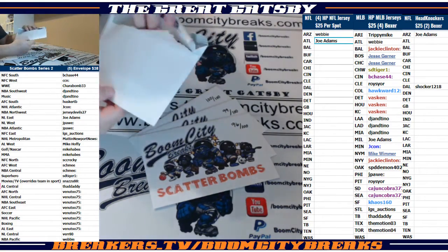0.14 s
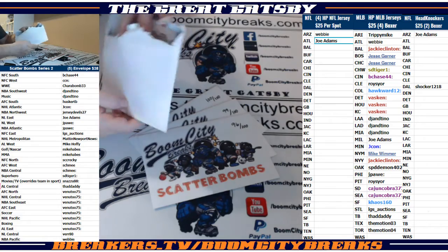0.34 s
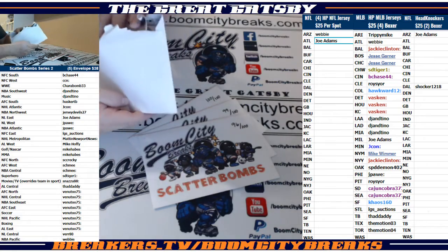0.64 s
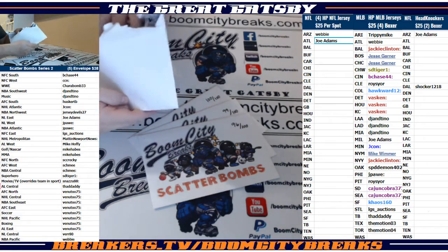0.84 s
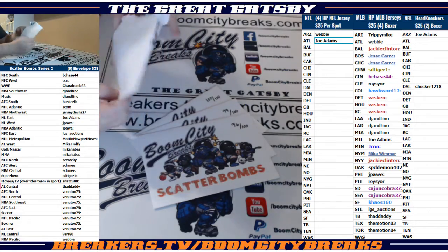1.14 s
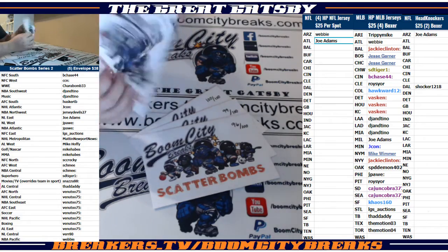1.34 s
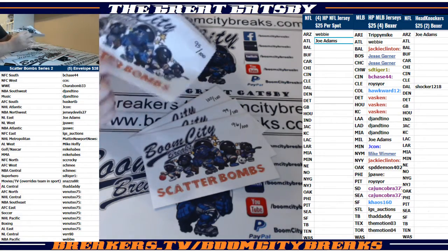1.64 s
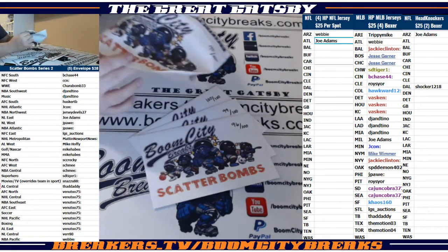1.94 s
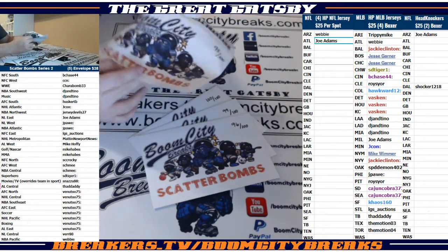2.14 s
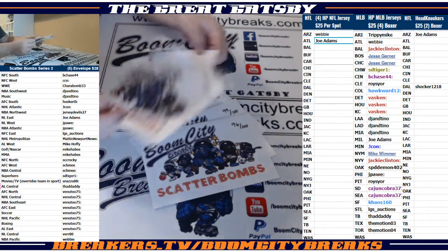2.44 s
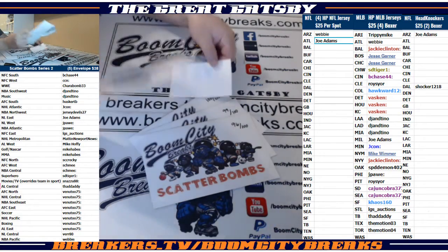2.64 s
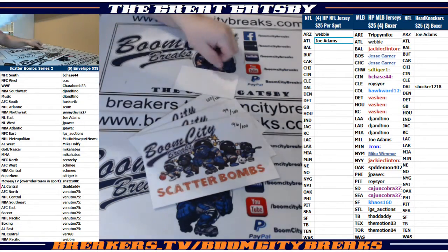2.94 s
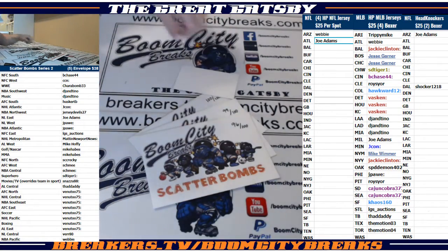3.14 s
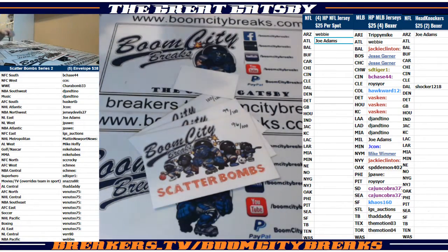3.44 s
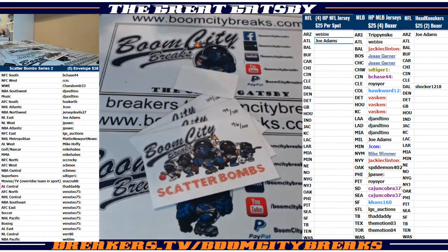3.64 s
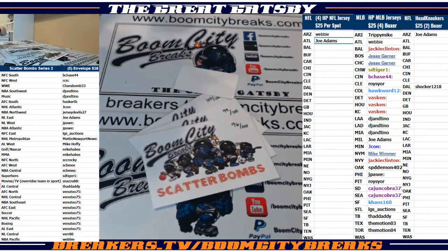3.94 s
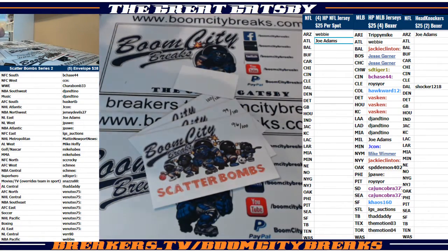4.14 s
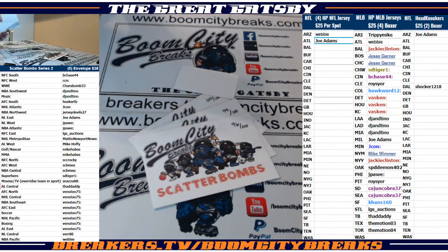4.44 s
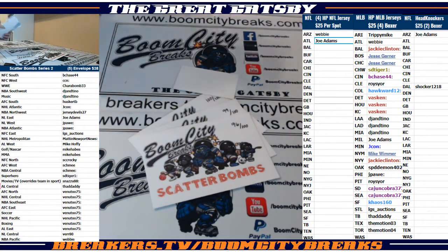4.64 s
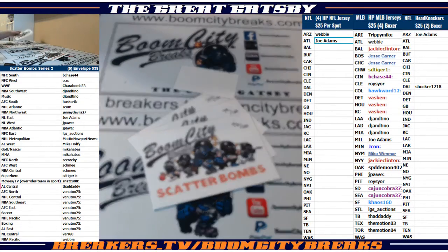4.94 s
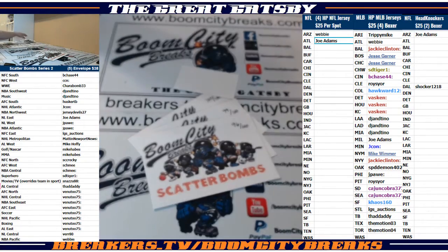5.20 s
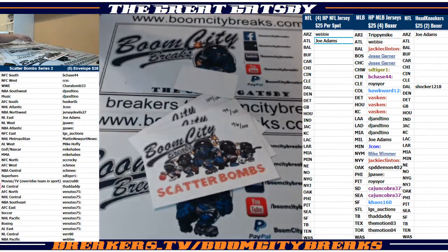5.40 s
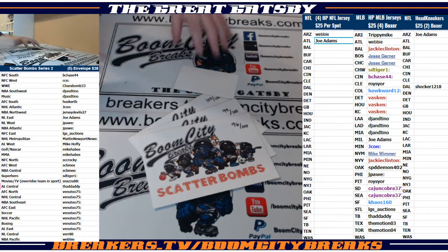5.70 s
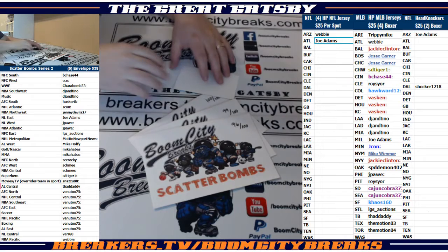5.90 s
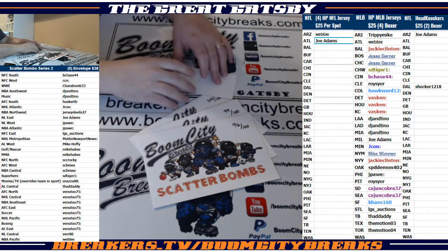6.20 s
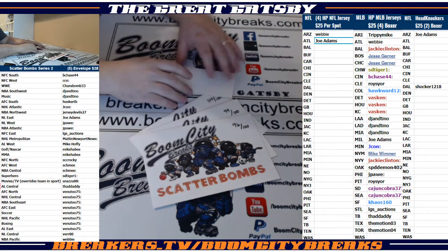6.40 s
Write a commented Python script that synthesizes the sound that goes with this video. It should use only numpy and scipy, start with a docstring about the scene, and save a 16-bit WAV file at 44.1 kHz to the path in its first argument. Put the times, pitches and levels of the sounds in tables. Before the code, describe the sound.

Hands tear, shake and lay down stiff paper on a table, heard close with little room echo. Dry crinkles, hollow pops and dull sheet thumps come in uneven clusters, strongest in the first half. A lull holds slight squeaks and quick scratchy rubs; the paper then buckles crisply again before faint touches and a steady low fan and mains hum remain.

```python
"""A paper envelope is torn open, shaken out and laid on a table in a small room.
Rustle and snaps are grainy noise through the colour of the sheet; facets ring, the sheet flaps in lumpy lows.
Low modes thump, something hard is rubbed in four short strokes, and resonant noise squeaks faintly.
Fan noise, narrow hum bands and a mains tone lie below; feedback delays make the room."""
import sys
import numpy as np
from scipy import signal
from scipy.io import wavfile
from scipy.ndimage import uniform_filter1d

SR = 44100
rng = np.random.default_rng(int(sys.argv[2]) if len(sys.argv) > 2 else 0)


def generate_wav(signal):
    """Clip the signal to [-1, 1] and save it as 16-bit WAV at the path in sys.argv[1]."""
    frames = np.transpose(np.atleast_2d(signal))
    scaled = np.clip(frames, -1, 1) * 32767
    pcm = np.round(scaled).astype(np.int16)
    wavfile.write(sys.argv[1], SR, pcm)


def linear_from_db(decibels):
    """Turn decibels (scalar or array-like) into linear amplitude factors; 0 gives 1."""
    return 10 ** (np.asarray(decibels, float) / 20)


N = 289296

# creases buckling: (time [s], drive level [dB], relative brightness [dB], nominal t60 [s], facet ring [Hz])
CREASE_SNAPS = [(0.093, -46, -9, 0.61, 1540), (0.176, -30.5, -2, 0.12, 2500),
                (0.224, -22.5, -14, 0.096, 1865), (0.363, -20.5, 0.5, 0.12, 3100),
                (0.499, -9.5, -25, 0.095, 1056), (0.506, -4.5, -18.5, 0.081, 1360),
                (0.54, -33, -3, 0.44, 960), (0.773, -33.5, -15, 0.083, 5900), (0.826, -25, -32, 0.11, 1140),
                (0.859, -30.5, -19, 0.33, 3850), (0.91, -28, -11, 0.32, 2970),
                (0.93, -16.5, -28, 0.055, 1120), (0.944, -16, 3, 0.026, 6230), (0.995, -33, -19, 0.1, 1350),
                (1.249, -32, -15, 0.13, 1620), (1.282, -28.5, 0, 0.16, 2860), (1.346, -26, -40, 0.35, 1150),
                (1.399, -27, -33, 0.1, 1620), (1.438, -30, 2, 0.089, 2820), (1.599, -24.5, -32, 0.11, 1620),
                (1.645, -15, -7.5, 0.055, 1280), (1.735, -21.5, -9, 0.29, 1540),
                (1.8, -22.5, 3, 0.19, 1470), (1.847, -10, -26, 0.075, 1500),
                (1.935, -8.5, -12, 0.052, 2210), (2.122, -29.5, -28, 0.072, 1440),
                (2.236, -6, -19, 0.075, 1430), (2.291, -20, -7, 0.14, 1570), (2.344, -29.5, 0, 0.24, 1080),
                (2.372, -27.5, 6.5, 0.11, 4970), (2.409, -25, 4, 0.13, 1040), (2.468, -21.5, -5, 0.1, 5900),
                (2.598, -37, -3, 0.25, 1060), (2.657, -21.5, -21, 0.078, 970), (2.735, -34, 1, 0.093, 3000),
                (2.751, -23.5, -1, 0.065, 3010), (2.928, -29.5, 3.5, 0.074, 6800),
                (2.957, -39, -14, 0.11, 930), (3.039, -45, -21, 0.11, 920), (3.067, -27, -15.5, 0.13, 1454),
                (3.119, -43, -3, 0.1, 736), (3.149, -43, -10.5, 0.043, 2310), (3.546, -54, 1.5, 0.11, 2300),
                (3.587, -42, -34.5, 0.059, 910), (3.643, -47, -17, 0.14, 6200),
                (3.665, -44, -20, 0.11, 1050), (4.241, -39, 3, 0.087, 2420), (4.345, -39.5, 6, 0.075, 3570),
                (4.37, -32, -11, 0.32, 4900), (4.409, -26, 1, 0.11, 2030), (4.456, -18.5, -5, 0.067, 6050),
                (4.502, -26.5, -9, 0.29, 1970), (4.521, -13.5, -16, 0.046, 1950),
                (4.569, -27, -39, 0.16, 960), (4.813, -45.5, -4, 0.08, 1700),
                (4.832, -40, 5.5, 0.054, 6750), (4.943, -32, -2.5, 0.17, 2530), (5.017, -40, 4, 0.13, 1750),
                (5.087, -23.5, -49, 0.27, 1200), (5.151, -10, -6.5, 0.19, 2310),
                (5.268, -30, -10.5, 0.34, 2260), (5.38, -51, -2, 0.061, 7590),
                (6.134, -51.5, -18.5, 0.11, 2526), (6.459, -49.5, -4, 0.14, 1305)]


def rms_one(x):
    """Scale to rms 1."""
    return x / np.sqrt(np.mean(x ** 2) + 1e-20)


def at_hz(points, hz):
    """Read a spectrum on a log-frequency axis."""
    points_hz, points_db = np.transpose(points)
    return np.interp(np.log(hz), np.log(points_hz), points_db)


def drift(rate_hz):
    """Slow random curve of rms 1: noise through two equal low-pass poles, run at SR / 40."""
    pole = np.exp(-2 * np.pi * rate_hz * 40 / SR)
    white = rng.standard_normal(N // 40 + 2002)
    slow = signal.lfilter([1], [1, -2 * pole, pole * pole], white)[2000:]   # skip the settling
    return np.interp(np.arange(N) / 40, np.arange(len(slow)), rms_one(slow))


def bands(low_hz, high_hz, count):
    """Centres and band-passes of a log-spaced filter bank."""
    edges = np.geomspace(low_hz, high_hz, count + 1)
    return [(np.sqrt(a * b), signal.butter(2, [a, b], "band", fs=SR, output="sos"))
            for a, b in zip(edges, edges[1:])]


def resonate(x, hz, width_hz):
    """One two-pole resonance, gain about 1 on top."""
    r = np.exp(-np.pi * width_hz / SR)
    zeros = np.array([1, 0, -1]) * (1 - r * r) / 2
    return signal.lfilter(zeros, [1, -2 * r * np.cos(2 * np.pi * hz / SR), r * r], x)


def resonate_twice(x, hz, width_hz):
    """The same resonance twice in series, for steeper skirts."""
    return resonate(resonate(x, hz, width_hz), hz, width_hz)


def coloured(spectrum, patchy_db, count):
    """Noise of a given spectrum, each band flickering on its own; rms 1."""
    white = rng.standard_normal((2, N))
    out = np.zeros(N)
    for k, (hz, sos) in enumerate(bands(spectrum[0][0], spectrum[-1][0], count)):
        gain = linear_from_db(at_hz(spectrum, hz) + patchy_db * drift(10))
        out += gain * signal.sosfilt(sos, white[k % 2])
    return rms_one(out)


def fall(t60_s, bend=1.0):
    """A jump that dies away, a third of a second long; bend over 1 holds first and drops later."""
    t = np.arange(SR // 3) / SR
    return linear_from_db(-60 * (t / np.clip(t60_s, 0.01, 0.6)) ** bend)


def add(out, start_s, piece):
    """Mix a piece in at a moment."""
    i = round(start_s * SR)
    out[i:i + len(piece)] += piece[:N - i]


def stroke_db(start_s, length_s, first_db, last_db, attack_s, release_db_per_s):
    """Level of one stroke: rises 20 dB per attack_s up to its start, slopes while it lasts, then dies."""
    t = np.arange(N) / SR - start_s
    held = first_db + (last_db - first_db) * np.clip(t / length_s, 0, 1)
    return held + 20 * np.minimum(t, 0) / attack_s - release_db_per_s * np.maximum(t - length_s, 0)


def background():
    """Fan noise, narrow noise bands of hum and a mains tone of wavering level."""
    # fan spectrum: (frequency [Hz], relative density [dB])
    fan_spectrum = [(20, -27.5), (70, -16.5), (200, -13.5), (500, -11.5), (760, -15), (1300, -19),
                    (4400, -33), (16000, -43.5)]
    # hum bands: (frequency [Hz], width of each pass [Hz], rms level [dB])
    hum_bands = [(202.5, 18, -75), (235.1, 5.7, -81), (320, 26, -75.5)]
    fan_db, mains_hz, mains_db = -69, 120, -75.5
    fan = linear_from_db(fan_db) * coloured(fan_spectrum, patchy_db=0.9, count=18)
    hum = np.zeros(N)
    for hz, width_hz, db in hum_bands:
        hum += linear_from_db(db) * rms_one(resonate_twice(rng.standard_normal(N), hz, width_hz))
    mains = linear_from_db(mains_db + 2 * drift(5)) * np.sin(2 * np.pi * mains_hz * np.arange(N) / SR)
    return fan + hum + mains


def room(x):
    """Ten feedback delays, duller on every round, stepped block by block."""
    t60_s, wall_cut_hz = 0.28, 6500
    dull = np.exp(-2 * np.pi * wall_cut_hz / SR)
    out = np.zeros(N)
    for k, lag in enumerate((np.geomspace(0.007, 0.031, 10) * SR).astype(int)):
        loop, state = x.copy(), [0.0]
        gain = linear_from_db(-60 * lag / SR / t60_s)
        for i in range(lag, N, lag):
            back, state = signal.lfilter([gain * (1 - dull)], [1, -dull], loop[i - lag:i], zi=state)
            loop[i:i + lag] += back[:N - i]
        out += (loop - x) * (-1) ** k
    return out


def squeaks():
    """Fingers and edges sliding: short swells of noise twice through a resonance."""
    # faint squeaks and hisses: (start [s], frequency [Hz], width of each pass [Hz], level [dB], length [s])
    slides = [(3.235, 3530, 70, -75, .08), (3.265, 1990, 80, -73, .05), (3.29, 2120, 160, -74, .19),
              (3.28, 3780, 160, -80, .2), (3.54, 5500, 500, -70, .05), (3.98, 2500, 70, -68, .15),
              (5.83, 1250, 300, -69, .18), (6.04, 1450, 300, -70, .09), (6.13, 7800, 5000, -72, .31),
              (6.1, 8600, 500, -78, .33), (5.91, 3850, 250, -74, .08), (6.01, 3850, 200, -74, .12)]
    t, out = np.arange(N) / SR, np.zeros(N)
    for start_s, hz, width_hz, db, length_s in slides:
        tone = rms_one(resonate_twice(rng.standard_normal(N), hz, width_hz))
        swell = np.sin(np.pi * np.clip((t - start_s) / length_s, 0, 1))
        out += linear_from_db(db) * swell * tone
    return out


def rubbing():
    """Friction noise through the narrow resonances of the rubbed thing, plus hiss."""
    # rubbing strokes: (start [s], length [s], drive level at first [dB], drive level at last [dB])
    rub_strokes = [(3.832, 0.079, -57.5, -55.5), (3.95, 0.058, -54, -54.5), (4.144, 0.078, -52, -61),
                   (4.231, 0.047, -52, -56.5)]
    # resonances of the rubbed thing: (frequency [Hz], nominal width [Hz], relative level [dB])
    rubbed_modes = [(1540, 80, -5), (2090, 70, -2), (2300, 150, -4), (2500, 120, 0), (3050, 150, -7),
                    (3200, 120, -7), (5190, 300, -7), (5600, 250, -10), (6080, 250, -11), (6860, 450, -8),
                    (8500, 300, -16), (9740, 400, -17), (10900, 450, -15), (11700, 500, -13),
                    (13300, 700, -22)]
    # friction hiss: (frequency [Hz], relative density [dB])
    hiss_spectrum = [(290, -2), (500, -9), (1580, -7), (1770, -22), (2430, -7.5), (4130, -14.5),
                     (6740, -8.5), (11300, -26), (15500, -44)]
    attack_s, release_db_per_s = 0.032, 398
    rings_db, hiss_db = 16.5, -1.5   # relative to the drive
    levels_db = [stroke_db(*row, attack_s, release_db_per_s) for row in rub_strokes]
    stroke = linear_from_db(np.max(levels_db, axis=0))
    friction = rng.standard_normal(N) * linear_from_db(1.5 * drift(20))
    drive = stroke * friction + 1e-18   # offset keeps the filters off denormals
    rings = np.zeros(N)
    for k, (hz, width_hz, db) in enumerate(rubbed_modes):
        mode = resonate(resonate(drive, hz, 0.98 * width_hz), hz, 1.06 * width_hz)
        rings += (-1) ** k * linear_from_db(db) * mode
    hiss = stroke * coloured(hiss_spectrum, patchy_db=2, count=14)
    return linear_from_db(rings_db) * rings + linear_from_db(hiss_db) * hiss


def thumps():
    """Dull knocks of sheet and hand: a soft push sets one low mode going, roughened by the contact."""
    # knocks: (time [s], drive level [dB], mode [Hz], t60 [s])
    knocks = [(0.177, -44.5, 220, 0.072), (0.302, -47, 302, 0.046), (0.363, -43.5, 262, 0.051),
              (0.496, -20.5, 543, 0.017), (0.509, -32, 262, 0.041), (0.504, -48, 129, 0.12),
              (0.929, -33.5, 254, 0.11), (1.018, -48.5, 259, 0.052), (1.203, -49.5, 60, 0.078),
              (1.216, -41.5, 194, 0.077), (1.344, -40, 320, 0.086), (1.381, -51, 55, .12),
              (1.387, -43.5, 169, 0.1), (1.589, -40.5, 190, 0.05), (1.644, -36, 185, 0.035),
              (1.819, -43, 296, 0.13), (1.824, -53, 128, 0.12), (1.94, -44, 663, 0.04),
              (2.113, -50, 238, 0.054), (2.237, -31, 590, 0.022), (2.247, -31.5, 320, 0.03),
              (2.245, -52, 112, 0.085), (2.314, -45, 135, 0.07), (2.349, -40, 620, 0.086),
              (2.597, -44, 558, 0.057), (2.613, -52, 50.4, 0.08), (2.655, -39, 554, 0.044),
              (2.694, -54, 60.7, 0.22), (2.74, -55, 188, 0.085), (2.787, -53, 440, 0.075),
              (2.972, -48, 492, 0.23), (3.069, -40, 480, 0.068), (3.585, -36.5, 710, 0.023),
              (3.675, -49.5, 640, 0.049), (4.472, -50.5, 204, 0.098), (4.522, -42.5, 476, 0.092),
              (4.561, -44.5, 388, 0.23), (5.093, -43.5, 366, 0.17), (5.256, -41.5, 343, 0.1),
              (5.826, -57.5, 60, 0.09), (6.062, -69, 71, 0.1), (6.477, -60, 85, .14)]
    out, t = np.zeros(N), np.arange(SR // 3) / SR
    swell = 1 - np.exp(-t / 0.003)
    for start_s, db, hz, t60_s in knocks:
        rough = rms_one(resonate_twice(rng.standard_normal(SR // 3), hz, hz))
        mode = 1.26 * np.sin(2 * np.pi * hz * t) + 0.5 * rough
        add(out, start_s, linear_from_db(db) * swell * fall(t60_s) * mode)
    return out


def handling():
    """Rustle drive and brightness: overlapping moves add power, the louder one sets more of the colour."""
    # hands tearing or dragging the paper: (start [s], length [s], rustle drive at first [dB],
    # rustle drive at last [dB], relative brightness [dB])
    hand_moves = [(0.0, 0.095, -51, -53, 6.5), (0.103, 0.27, -46.5, -48.5, 3), (0.396, 0.15, -60, -54, 5),
                  (0.519, 0.067, -46, -48, 0), (0.605, 0.17, -56.5, -61, 0.5), (0.752, 0.2, -54, -44.5, 6),
                  (.99, 0.11, -49.5, -54.5, 3), (1.092, .14, -52.5, -56.5, 5),
                  (1.249, 0.19, -44, -43.5, -1), (1.46, 0.16, -56, -49, 6), (1.577, 0.13, -48, -50, 5),
                  (1.733, .2, -41.5, -46, -0.5), (1.963, .15, -44.5, -50, 0.5), (2.1, .1, -49, -43.5, 4.5),
                  (2.202, 0.1, -45.5, -36.5, 2.5), (2.318, 0.16, -37, -45, 4),
                  (2.497, 0.11, -53, -62.5, 4.5), (2.609, 0.11, -53, -50, -6.5),
                  (2.745, 0.087, -45.5, -60.5, 4.5), (2.937, 0.068, -49, -60.5, 5.5),
                  (3.123, 0.059, -60, -73, 7), (3.213, 0.31, -71, -77, 1), (3.55, .04, -65.5, -71, -1),
                  (3.646, 0.034, -64.5, -76, 11.5), (3.7, 0.11, -71.5, -69.5, -2.5),
                  (4.354, 0.162, -55.5, -41, 6.5), (4.536, 0.13, -41.5, -61.5, 0.5),
                  (4.651, 0.14, -57.5, -69, 6), (4.8, 0.11, -67, -60, 6.5), (4.929, .07, -57, -59.5, 5),
                  (5.004, 0.11, -57.5, -53, 6), (5.161, 0.21, -38.5, -63.5, 4),
                  (5.741, 0.081, -76.5, -75, 1), (5.835, .08, -71.5, -82, 11.5),
                  (5.872, 0.16, -70, -66, -5), (6.07, 0.078, -63.5, -70.5, 6),
                  (6.18, .24, -71.5, -74, -7.5), (6.455, .1, -75.5, -74.5, 4.5)]
    attack_s, release_db_per_s, floor_db = 0.028, 298.5, -120
    levels_db = np.array([stroke_db(*move[:4], attack_s, release_db_per_s) for move in hand_moves])
    power = linear_from_db(2 * np.maximum(levels_db, floor_db))
    total = power.sum(axis=0)
    return 10 * np.log10(total), np.array(hand_moves)[:, 4] @ power / total


def dying(gains):
    """Envelope of all snaps: a crease crackles, then stops; the longer it lasts, the softer it starts."""
    out, t = np.zeros(N), np.arange(SR // 3) / SR
    for (start_s, _, _, t60_s, _), gain in zip(CREASE_SNAPS, gains):
        onset = 1 - np.exp(-t / (0.008 * t60_s))
        add(out, start_s, gain * onset * fall(0.65 * t60_s, bend=1.145))
    return out


def flapping():
    """The whole sheet pushes air as it is moved and as it buckles: lumpy lows."""
    # flap spectrum: (frequency [Hz], relative density [dB])
    flap_spectrum = [(40, -33), (100, -8.5), (200, -4.5), (320, 3), (520, -4), (900, -6.5)]
    flap_db, follows = -62.5, 0.86   # level at a rustle drive of -47.5 dB, brightness 0; share of its swing
    per_bright_db, snap_push_db = -0.18, -33   # smooth bright drags flap less; push relative to snap drive
    rustle_db, bright_db = handling()
    moved = linear_from_db(flap_db + follows * (rustle_db + 47.5) + per_bright_db * bright_db)
    push = dying(linear_from_db(np.array(CREASE_SNAPS)[:, 1] + snap_push_db))
    buckled = uniform_filter1d(push, size=SR // 50, origin=SR // 120)   # 20 ms mean, shifted 8 ms
    return (moved + buckled) * coloured(flap_spectrum, patchy_db=4.5, count=9)


def facets():
    """The flat facet beside each crease rings briefly at a pitch of its own."""
    facet_db, follows = -36.5, 0.78   # ring peak for a snap drive of -27.5 dB; share of the snaps' swing
    out = np.zeros(N)
    for start_s, snap_db, _, t60_s, hz in CREASE_SNAPS:
        burst = rng.standard_normal(SR // 3) * fall(0.83 * t60_s)
        ring = resonate_twice(burst, hz, hz / 4.5)
        add(out, start_s, linear_from_db(facet_db + follows * (snap_db + 27.5)) * ring / np.abs(ring).max())
    return out


def fibres(per_s, spread_db, clump_db, smooth):
    """Two draws of fibre breaks: clicks in clumps over smooth friction noise, sharing their moments."""
    born = rng.random(N) < per_s * linear_from_db(clump_db * drift(25)) / SR
    sizes = rms_one(born * linear_from_db(spread_db * np.minimum(rng.exponential(1, N), 5)))
    return rms_one((smooth + sizes) * rng.standard_normal((2, N)))


def paper():
    """Rustle and snaps excite the same sheet; brightness tilts its upper bands, the pocket resonates."""
    # colour of the sheet: (frequency [Hz], band gain [dB])
    sheet_spectrum = [(410, -48), (700, -19.5), (841, -13), (1110, -6), (1250, -6.5), (1360, -9),
                      (1870, -9.5), (2330, -9), (3370, -11.5), (3890, -11.5), (6740, -14.5), (12300, -27),
                      (14800, -36.5), (16000, -43.5)]
    # resonances of the envelope pocket: (frequency [Hz], width [Hz], relative gain [dB])
    pocket_modes = [(1120, 42, -8.5), (1426, 27, 0), (1570, 34, 1.5), (2039, 25, 1.5), (2310, 7.6, -11.5),
                    (2907, 73, -4.5), (3845, 180, -9.5)]
    rustle_db, bright_db = handling()
    _, snap_db, snap_bright_db, *_ = np.transpose(CREASE_SNAPS)
    grain = fibres(per_s=2500, spread_db=4, clump_db=3, smooth=1.2)
    crack = fibres(per_s=3000, spread_db=3, clump_db=2, smooth=1)
    bank = bands(760, 16000, count=22)
    chance, out = rng.standard_normal((len(CREASE_SNAPS), len(bank))), np.zeros(N)
    for k, (hz, sos) in enumerate(bank):
        upper = np.clip(np.log2(hz / 2500) / 1.55, 0, 1)   # how far brightness reaches this band
        bending_db = 2.14 * drift(4) + 0.74 * drift(19)   # the sheet's colour shifts as it bends
        rustle = linear_from_db(rustle_db + 15 + upper * (bright_db + 2) + bending_db)
        dull_db = -6 * max(0, np.log2(hz / 7500))   # every snap is duller above 7500 Hz
        tilt_db = upper * (snap_bright_db + 7)
        snaps = dying(linear_from_db(snap_db + 3 + dull_db + tilt_db + 2.3 * chance[:, k]))
        excitation = rustle * grain[k % 2] + snaps * crack[k % 2]
        out += linear_from_db(at_hz(sheet_spectrum, hz)) * signal.sosfilt(sos, excitation)
    # a small sheet radiates no lows
    sheet = signal.sosfilt(signal.butter(4, 880, "high", fs=SR, output="sos"), out)
    pocket = np.zeros(N)
    for hz, width_hz, db in pocket_modes:
        pocket += linear_from_db(db - 1 + 4.8 * drift(3.3)) * resonate(sheet, hz, width_hz)
    return sheet + pocket


def scene():
    """All sources, the near ones heard with the room."""
    room_db = -21
    near = paper() + facets() + flapping() + thumps() + rubbing() + squeaks()
    return (near + linear_from_db(room_db) * room(near) + background())[None]


def top_cut(x):
    """Nothing passes above the cut-off."""
    return signal.sosfilt(signal.butter(12, 16450, fs=SR, output="sos"), x)


def record(dry):
    """Take the finished mix at its own level."""
    return top_cut(dry)


dry = scene()
out = record(dry)
generate_wav(out)
```